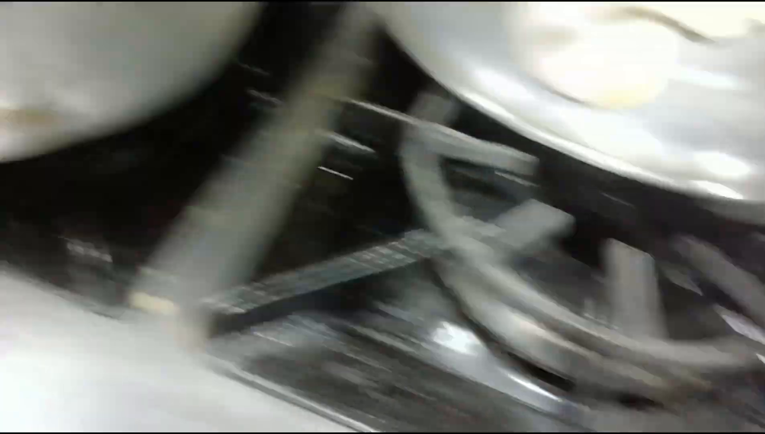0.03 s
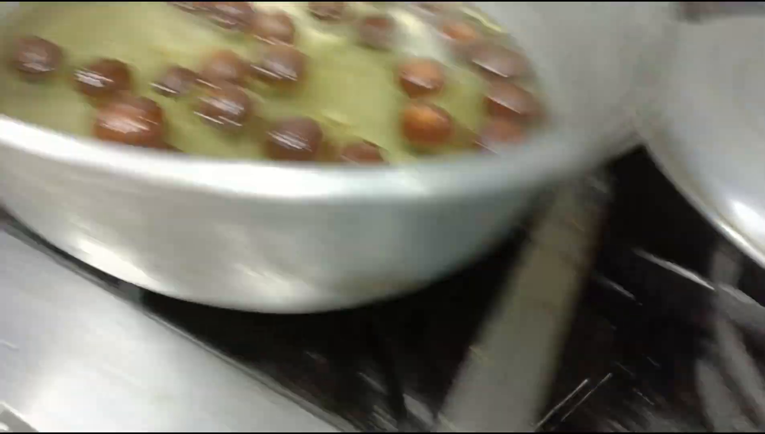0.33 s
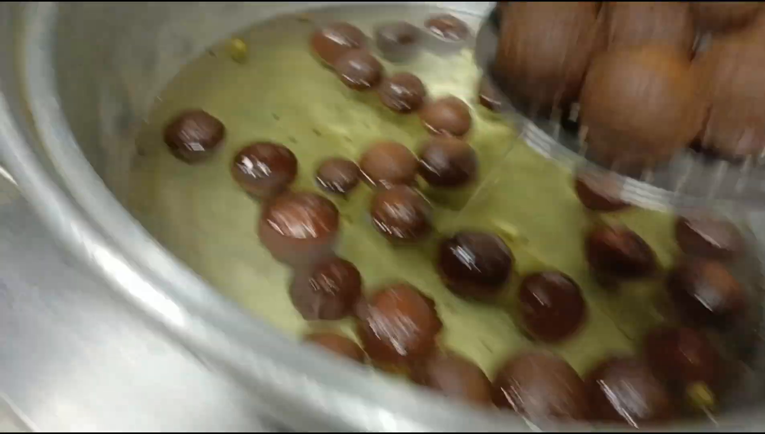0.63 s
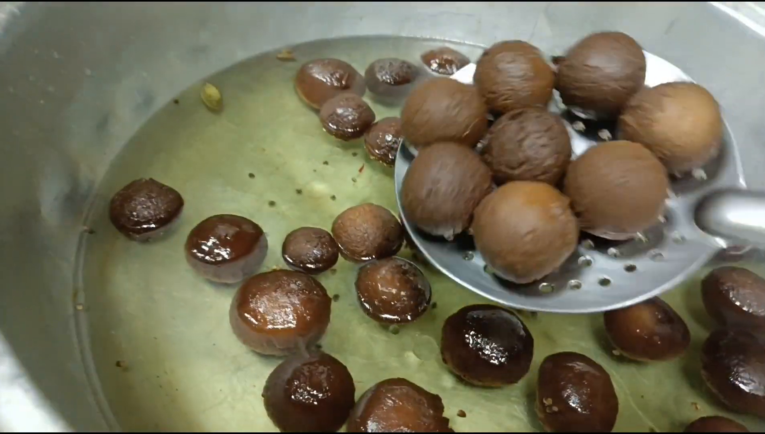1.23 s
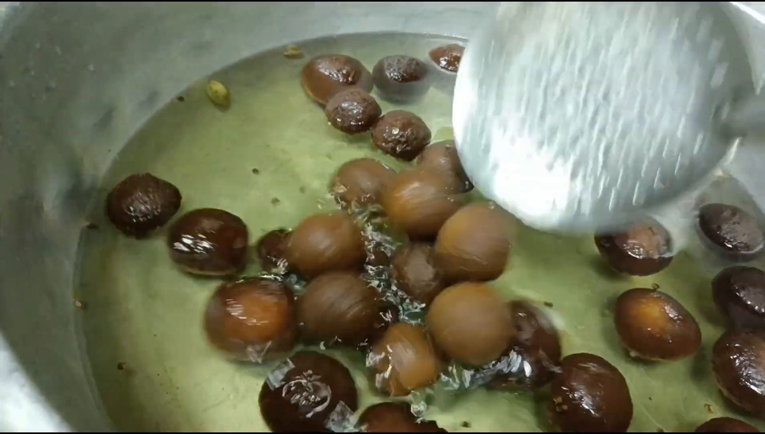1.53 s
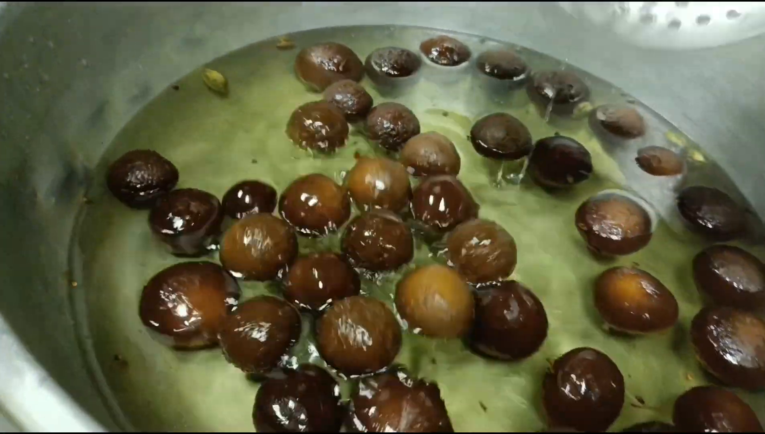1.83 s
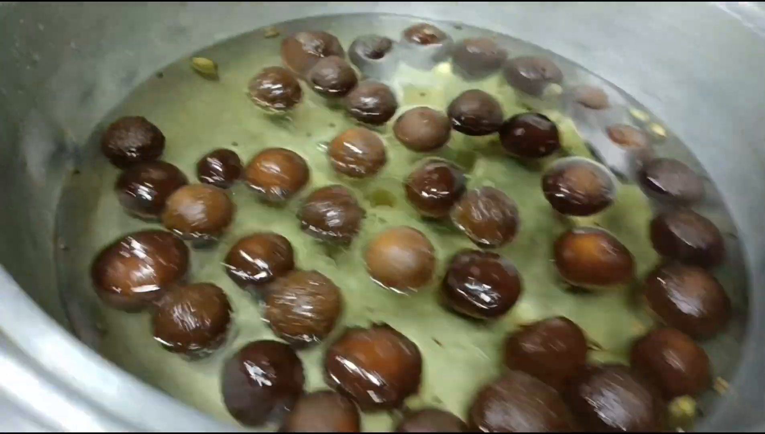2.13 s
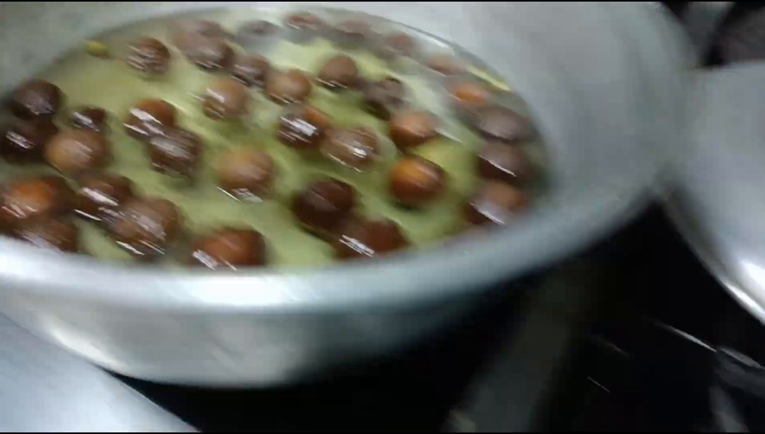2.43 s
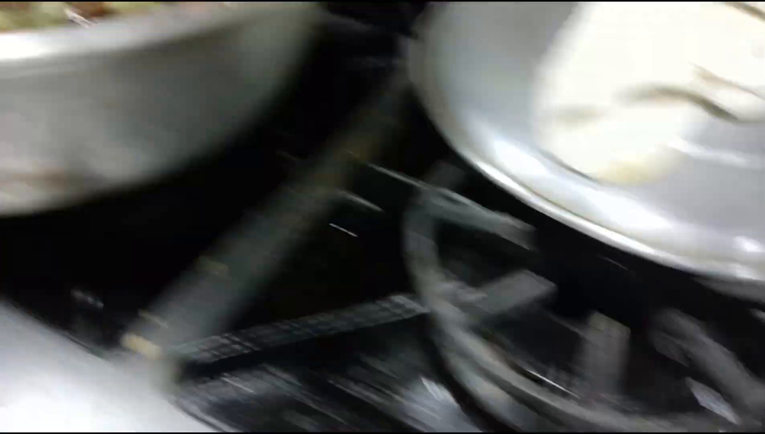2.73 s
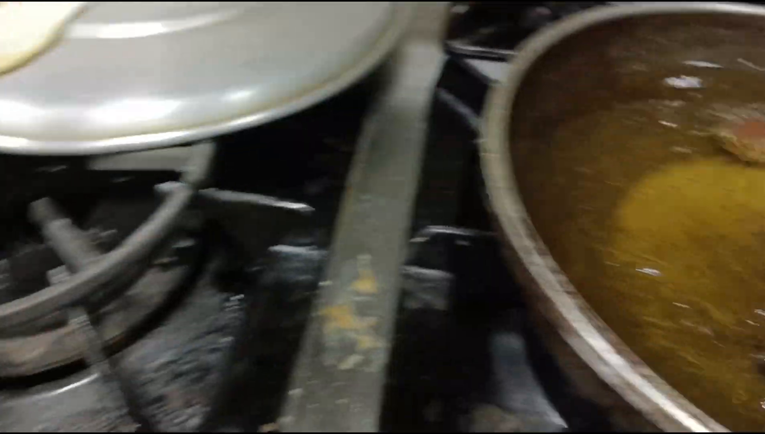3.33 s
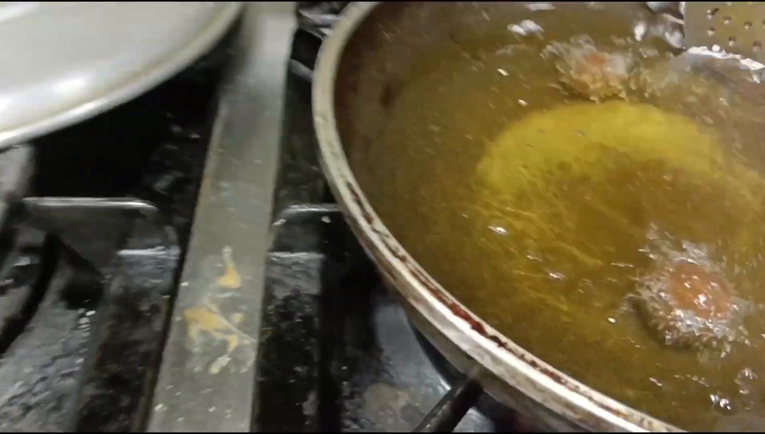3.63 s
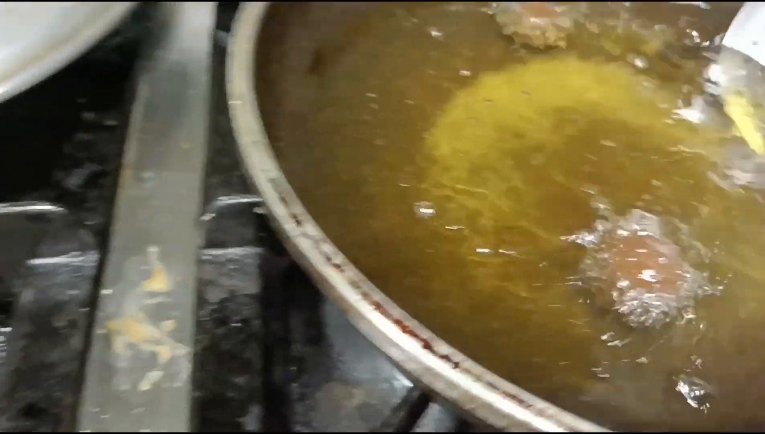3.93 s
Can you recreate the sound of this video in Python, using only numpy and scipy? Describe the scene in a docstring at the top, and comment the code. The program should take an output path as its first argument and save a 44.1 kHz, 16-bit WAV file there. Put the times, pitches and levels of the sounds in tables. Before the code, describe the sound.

Crackling fizz as hot fried balls plop into syrup, with frying oil hissing nearby.

```python
"""Hot fried balls slap and plop into a metal pot of syrup and set off a crackling fizz that dies away.
Bursting bubbles make the fizz, and the hollow of the pot colours it. Beside it, tiny steam bursts hiss
in a pan of oil over a gas flame; levels shift as the microphone moves from pan to pot and back.
The kitchen hums, a few soft thumps pass, and at the end a utensil clanks on metal close by."""
import sys
import numpy as np
from scipy import signal
from scipy.fft import rfft, irfft
from scipy.io import wavfile

SR = 44100
rng = np.random.default_rng(int(sys.argv[2]) if len(sys.argv) > 2 else 0)


def persist_wave(psi):
    """Save psi, clipped to +-1, as 16-bit WAV."""
    counts = np.round(np.clip(psi, -1, 1) * 32767).astype(np.int16)
    wavfile.write(sys.argv[1], SR, np.atleast_2d(counts).T)


N = 176400


def undb(db):
    """Decibels to gain."""
    return 10 ** (np.asarray(db, float) / 20)


def curve(rows):
    """A fader ride: gain over time, one row for each dB column."""
    rows = np.array(rows, float)
    return undb([np.interp(np.arange(N) / SR, rows[:, 0], col) for col in rows[:, 1:].T])


def waver(depth_db, per_s):
    """A gain that wanders at random."""
    return undb(depth_db * np.interp(np.arange(N) / SR * per_s, np.arange(256), rng.standard_normal(256)))


def since(start):
    """Seconds since the start, zero before it."""
    return np.maximum(np.arange(N) / SR - start, 0)


def strike(age, attack_s, t60_s):
    """A straight rise, then an exponential fall."""
    return np.minimum(age / attack_s, 1) * np.exp(-np.log(1000) * np.maximum(age - attack_s, 0) / t60_s)


def colour(x, rows, size=4096):
    """An EQ that gives unit white noise the listed dB per Hz, one row for each dB column."""
    rows = np.array(rows, float)
    log_hz = np.log(np.maximum(np.fft.rfftfreq(size, 1 / SR), 1))
    gain = undb([np.interp(log_hz, np.log(rows[:, 0]), col) for col in rows[:, 1:].T]) * np.sqrt(SR / 2)
    cepstrum = irfft(np.log(gain))
    cepstrum[:, 1:size // 2] *= 2  # minimum phase: nothing rings ahead of a click
    cepstrum[:, size // 2 + 1:] = 0
    impulse = irfft(np.exp(rfft(cepstrum)))
    return signal.fftconvolve(np.atleast_2d(x), impulse, axes=1)[:, :N]


def split(x, hz):
    """The parts below and above a frequency."""
    low = signal.sosfiltfilt(signal.butter(3, hz, fs=SR, output="sos"), x)
    return low, x - low


def flutter(hz, width_hz):
    """An unsteady tone of the given bandwidth; rms 1."""
    noise = rng.standard_normal(N) + 1j * rng.standard_normal(N)
    wander = signal.sosfilt(signal.butter(2, width_hz / 2, fs=SR, output="sos"), noise)
    tone = (wander * np.exp(2j * np.pi * np.cumsum(hz * np.ones(N)) / SR)).real
    return tone / tone.std()


def bursts(per_s, spread_db, max_boost_db=20):
    """Clicks of bursting bubbles, many small and a few large; rms 1."""
    chance, size, sign = rng.random(N), rng.exponential(size=N), rng.choice([-1, 1], N)
    clicks = (chance < per_s / SR) * sign * undb(np.minimum(spread_db * size, max_boost_db))
    return clicks / clicks.std()


def wide_bursts(per_s, spread_db, shared=.25):
    """Bursts that reach the two ears partly alike, partly by unrelated paths."""
    sides = np.array([bursts(per_s, spread_db), bursts(per_s, spread_db)])
    return np.sqrt(1 - shared) * sides + np.sqrt(shared) * bursts(per_s, spread_db)


def reflect(x, t60_s, wet_db, size=4096):
    """Dense reflections between metal walls, different for each ear; keeps the power."""
    tail = rng.standard_normal((2, size)) * strike(np.arange(size) / SR, 0.00057, t60_s)
    tail *= undb(wet_db) / np.sqrt((tail ** 2).sum(1, keepdims=True))
    tail[:, 0] = 1  # direct sound
    return signal.fftconvolve(np.atleast_2d(x), tail / np.hypot(1, undb(wet_db)), axes=1)[:, :N]


def reflect_moving(x, t60_s, wet_db, crossfade_s=.25):
    """Reflections whose pattern keeps changing as the microphone moves."""
    position = np.arange(N) / SR / crossfade_s
    fades = (np.cos(np.pi / 2 * np.minimum(abs(position - k), 1)) for k in range(int(position[-1]) + 2))
    return sum(reflect(x * fade, t60_s, wet_db) for fade in fades)


def smear(x, t60_s, wet_db):
    """Diffuse reflections: every click leaves a short tail of noise; keeps the power."""
    pole = np.exp(-2 * np.log(1000) / (t60_s * SR))
    tail = np.sqrt(signal.lfilter([1 - pole], [1, -pole], x ** 2)) * rng.standard_normal(x.shape)
    return (x + undb(wet_db) * tail) / np.hypot(1, undb(wet_db))


def delay_left(x, lag_s=.00023):
    """Sound from the pot reaches the left side a little late."""
    return np.array([x[np.maximum(np.arange(N) - round(lag_s * SR), 0)], x])


def kitchen():
    """Wavering room tone, alike in both ears in the bass, a hum and a few soft thumps."""
    # room tone: freq_hz, level_db
    room_eq = [(20, -108), (45, -93.5), (75, -84.5), (130, -89), (220, -87), (340, -93.5), (520, -101.5),
               (750, -100), (1200, -108), (2500, -113), (6000, -130)]
    # its fader: time_s, gain_db
    room_fader = [(0, -5), (.5, -9.5), (1.2, -5), (2, -5), (3.2, -7.5), (4, -9)]
    # hum partials: pitch_hz, level_db
    partials = [(99.6, -72), (199, -74), (243, -75.5), (299, -77.5)]
    # low thumps: start_s, level_db
    thump_cues = [(1.532, -58), (1.844, -49), (2.387, -54.5), (2.941, -48.5), (3.901, -50)]
    wide = signal.sosfilt(signal.butter(1, 597, "high", fs=SR, output="sos"), rng.standard_normal((2, N)))
    bands = split(colour(rng.standard_normal(N) + wide, room_eq), hz=150)
    air = sum(band * waver(depth_db=-0.5, per_s=9) for band in bands) * curve(room_fader)
    hum = thumps = 0
    for hz, db in partials:
        drift = 4.02 * np.cumsum(rng.standard_normal(N)) / np.sqrt(SR)
        hum += np.sqrt(2) * undb(db) * np.sin(2 * np.pi * hz * since(0) + drift)
    for start, db in thump_cues:
        age = since(start)
        thumps += undb(db) * strike(age, attack_s=0.016, t60_s=0.16) * np.sin(2 * np.pi * 78 * age)
    return air + hum + thumps


def burner():
    """The gas flame roars softly under the pan."""
    # flame roar: freq_hz, level_db
    roar_eq = [(150, -112), (240, -90.5), (400, -97), (520, -92), (680, -102), (1100, -114), (3000, -125)]
    # louder near the flame: time_s, gain_db
    roar_fader = [(0, -3.5), (.45, -1.5), (.8, -3), (1.2, -7.5), (2.8, -12.5), (3.3, -6), (3.6, -3.5),
                  (4, -4.5)]
    noise = rng.standard_normal(N) + undb(-3) * rng.standard_normal((2, N))
    return colour(noise, roar_eq) * curve(roar_fader)


def oil():
    """Countless tiny steam bursts merge into a hiss; larger ones gurgle under it."""
    # frying hiss: freq_hz, left_db, right_db
    hiss_eq = [(396, -115, -115), (980, -102, -101), (2400, -103, -100), (4300, -111, -107),
               (5600, -102, -100), (6150, -109, -103), (6540, -107, -85.5), (6820, -112, -99),
               (8800, -106, -90), (8700, -104, -103), (9970, -85.5, -99), (12000, -87, -107),
               (11670, -86.5, -95.5), (13670, -88.5, -101), (15300, -95, -101), (16700, -112, -104)]
    # its fader as the microphone turns: time_s, left_db, right_db
    hiss_fader = [(0, -4.5, -3.5), (.12, -4.5, -6.5), (.33, -2.5, -5.5), (.62, -4, -6), (.8, -4, -5.5),
                  (.95, -5.5, -4), (1.5, -7.5, -7.5), (3.1, -12, 1), (3.4, -8, 0), (3.56, -3, -5),
                  (3.75, -6.5, -6.5), (3.88, -8, -11), (4, -20, -11)]
    # extra ride on its top treble: time_s, gain_db
    top_fader = [(0, 8), (.8, 3), (1.3, 1), (3.1, -18), (3.45, -9), (4, -3)]
    # gurgle near the pan: freq_hz, left_db, right_db
    gurgle_eq = [(305, -112, -112), (619.5, -105, -104), (805, -107, -104), (950, -100, -91),
                 (1040, -108, -107), (1580, -100, -104), (1920, -103, -104), (1964, -99, -99.5),
                 (2500, -104, -107), (3300, -105, -108), (4850, -120, -120)]
    # its fader: time_s, gain_db
    gurgle_fader = [(0, -3), (2.3, -8.5), (2.7, 0), (3.1, 10), (3.25, 4), (3.65, 2.5), (4, -1)]
    body, top = split(colour(wide_bursts(per_s=15000, spread_db=3.5), hiss_eq), hz=13900)
    hiss = (body + top * curve(top_fader)) * curve(hiss_fader) * waver(depth_db=.7, per_s=22)
    large_bursts = reflect_moving(bursts(per_s=700, spread_db=2), t60_s=0.052, wet_db=14)
    gurgle = colour(large_bursts, gurgle_eq) * curve(gurgle_fader)
    return hiss + gurgle * waver(depth_db=3, per_s=6.7)


def simmer():
    """Fine bubbles burst steadily in the syrup."""
    # simmer inside the pot: freq_hz, left_db, right_db
    simmer_eq = [(1250, -112, -110), (2400, -108, -103), (3720, -109, -96), (3820, -116, -110),
                 (4780, -116, -93.5), (5470, -114, -86), (5840, -116, -95.5), (6800, -116, -88),
                 (8150, -116, -95.5), (9040, -102, -91.5), (10280, -89.5, -91), (12300, -88, -86.5),
                 (16800, -109, -99)]
    # its fader: time_s, gain_db
    simmer_fader = [(0, -9), (.85, -12), (1.15, -3), (1.32, -1), (1.55, 0.5), (1.88, 0), (2.6, -5.5),
                    (3.28, -3.5), (3.42, -8.5), (4, -15)]
    return colour(wide_bursts(per_s=15000, spread_db=2.5), simmer_eq) * curve(simmer_fader)


def whistles():
    """Thin, rough tones of escaping steam glide as they swell and fade."""
    # steam jets in the syrup: start_s, end_s, first_hz, last_hz, width_hz, left_db, right_db
    jets = [(0.1, 0.28, 5250, 5400, 140, -64, -62), (1.22, 1.75, 5000, 5400, 360, -78, -56.5),
            (2.023, 2.14, 3340, 3120, 280, -65, -58)]
    out = 0
    for start, end, first_hz, last_hz, width, left, right in jets:
        progress = np.minimum(since(start) / (end - start), 1)
        tone = flutter(first_hz + (last_hz - first_hz) * progress, width)
        out += undb([[left], [right]]) * tone * np.sqrt(abs(np.sin(np.pi * progress)))
    return out


def bubbles(count=520, low_hz=633, high_hz=2470, cycles=5.1, glide=0.16, size=2400):
    """Small bubbles in syrup and oil ring for a few cycles each, rising in pitch."""
    # bubbling fader: time_s, gain_db
    fader = [(0, -92), (2, -90), (2.25, -80), (2.7, -64), (3.1, -67), (3.3, -62), (3.65, -65), (4, -85)]
    out, age = np.zeros((2, N + size)), np.arange(size) / SR
    for when, pitch, softness, side in rng.random((count, 4)):
        hz = low_hz * (high_hz / low_hz) ** pitch
        t60, at = cycles / hz, int(when * N)
        tone = strike(age, 0.00066, t60) * np.sin(2 * np.pi * hz * age * (1 + glide * age / t60 / 2))
        level_db = -3 * np.log(softness + 0.023)
        out[:, at:at + size] += undb([[-8 * side], [0]]) * undb(level_db) * tone
    return out[:, :N] * curve(fader)


def clank(start_s=3.9772, right_lag_s=0.000159, thud_hz=156):
    """A utensil strikes metal: a scrape, ringing modes and a thud through the stove."""
    # metal modes: pitch_hz, left_db, right_db, t60_s
    modes = [(506, -44, -48, 0.064), (1005, -61, -41, 0.25), (1554, -49, -35.5, 0.13),
             (2490, -29.5, -35, 0.42), (3240, -22, -17, .06), (3312, -22.5, -13.5, 0.051),
             (3553, -17.5, -15, 0.25), (4600, -37, -30, 0.043), (5100, -47, -29, 0.042),
             (5900, -26, -47, 0.027), (6170, -48, -29, 0.14), (7680, -34, -29.5, 0.046),
             (11600, -26.5, -31, 0.045), (13900, -31, -40, 0.046), (15350, -42, -36, .05)]
    # contact scrape: freq_hz, left_db, right_db
    scrape_eq = [(40, -90, -99), (250, -72.5, -66.5), (450, -63.5, -69), (740, -80, -69.5),
                 (1390, -64.5, -84), (3300, -71.5, -59), (4180, -81, -69), (5700, -68, -61.5),
                 (8000, -75.5, -84), (9700, -69, -77), (13500, -71.5, -72), (16000, -76, -68)]
    age = np.array([since(start_s), since(start_s + right_lag_s)])
    ringing = sum(undb([[left], [right]]) * strike(age, 0.003, t60) * np.sin(2 * np.pi * hz * age)
                  for hz, left, right, t60 in modes)
    friction = rng.standard_normal(N) * strike(age[0], attack_s=0.00019, t60_s=0.17)
    scrape = colour(reflect(friction, t60_s=0.011, wet_db=-6), scrape_eq)
    thud = undb(-33) * strike(age, attack_s=0.024, t60_s=.15) * np.sin(2 * np.pi * thud_hz * age)
    return ringing + scrape + thud


def slaps():
    """The entering balls slap the syrup: short, wet flicks of noise."""
    # surface hits: start_s, left_db, right_db
    hits = [(1.923, -50, -36), (1.9316, -33, -23), (1.9412, -28.5, -32.5), (1.989, -41, -39),
            (1.997, -52, -37.5), (2.041, -34, -33)]
    # their colour: freq_hz, left_db, right_db
    spray_eq = [(1010, -19, -7), (3660, -6, -11), (4630, -10, -13), (5600, -11, 10), (8400, -26, -10),
                (11300, 5.5, 3.5), (15400, -7, 3)]
    envelope = sum(undb([[left], [right]]) * strike(since(start), attack_s=.001, t60_s=0.022)
                   for start, left, right in hits)
    spray = colour(rng.standard_normal((2, N)), spray_eq)
    return undb(-1.5) * envelope * spray / spray.std(1, keepdims=True)


def plops(rise_per_s=1.37, left_db=-12):
    """Air cavities left by the balls ring with rising pitch."""
    # cavities: start_s, pitch_hz, level_db, t60_s
    cavities = [(1.941, 850, -36.5, 0.049), (1.9445, 438, -47, 0.12), (1.9475, 1360, -45, 0.047),
                (1.9525, 684, -38, 0.017), (1.954, 916, -44, 0.081), (1.9675, 876, -39, 0.029),
                (1.969, 1740, -51, 0.012), (1.9725, 580, -35, 0.017), (1.978, 405.6, -41.5, 0.24),
                (1.989, 760, -39, 0.039), (1.9965, 900, -39.5, 0.04), (1.998, 1490, -49, 0.021),
                (2.003, 600, -52, 0.036), (2.015, 413, -45, 0.16), (1.994, 150, -52.5, 0.27),
                (2.155, 234, -44, 0.026)]
    out = 0
    for start, hz, db, t60 in cavities:
        age = since(start)
        tone = np.sin(2 * np.pi * hz * age * (1 + rise_per_s * age / 2))
        out += undb(db) * strike(age, 0.0018, t60) * tone
    return out * undb([[left_db], [0]])


def slosh(start_s=1.940, attack_s=0.0021, hold_s=0.048, t60_s=0.29):
    """The syrup churns briefly as the balls go in."""
    # churning syrup: freq_hz, left_db, right_db
    churn_eq = [(90, -104, -104), (146, -81, -89), (250, -91, -88), (425, -78, -74), (650, -77, -73),
                (930, -77, -78), (1120, -95, -95), (1370, -84, -83), (1900, -88, -87), (3080, -99, -98),
                (6000, -115, -114)]
    rise = np.minimum(since(start_s) / attack_s, 1)
    fall = np.exp(-np.log(1000) * since(start_s + hold_s) / t60_s)
    churn = bursts(per_s=1500, spread_db=3) * rise * fall
    return colour(reflect(churn, t60_s=0.11, wet_db=5.5), churn_eq)


def gushes(left_db=-9):
    """The syrup bubbles up in short gushes that each ring one hollow pitch in the pot."""
    # gushes: centre_s, length_s, pitch_hz, width_hz, level_db
    cues = [(2.146, 0.05, 2400, 200, -63.5), (2.27, 0.12, 2050, 90.5, -47), (2.285, 0.064, 1570, 120, -59),
            (2.457, 0.14, 2060, 70, -48), (2.58, .07, 2930, 150, -56), (2.583, 0.048, 950, 110, -56),
            (2.63, 0.057, 1550, 120, -57), (2.787, 0.12, 954, 90, -62), (2.763, 0.046, 650, 90, -61),
            (2.85, .06, 2100, 150, -46), (2.93, .12, 920, 80, -61.5), (2.96, 0.066, 1490, 89.4, -56.5),
            (3.1, 0.14, 1000, 80, -74), (3.155, .05, 2470, 90, -57)]
    out = 0
    for centre, length, hz, width, db in cues:
        progress = np.minimum(since(centre - length / 2) / length, 1)
        out += undb(db) * flutter(hz, width) * np.sin(np.pi * progress)
    return delay_left(out) * undb([[left_db], [0]])


def pops(crossover_hz=9500, cycles=25, size=2048):
    """Single large bubbles snap, each with its own brightness, brief ring and reflections."""
    # loud pops: start_s, left_db, right_db, treble_db, ring_hz, ring_db
    cues = [(2.1556, -20, -22, 0, 5400, -10), (2.3953, -26, -19, -8, 5350, -8),
            (2.5012, -26, -16, -13, 5100, -2), (2.5892, -20, -21, 1, 3750, -12),
            (2.6597, -20, -22, 3, 11500, -1), (2.7926, -26, -21, -5, 5800, -8),
            (2.8247, -24, -22, -2, 3800, -9), (2.8622, -22, -25, 3, 11500, -7),
            (2.9099, -26, -23, -4, 8400, -5), (2.925, -33, -26, 0, 4900, -12),
            (2.952, -31, -29, -6, 5470, 0), (2.9722, -28, -28, 0, 5200, -8),
            (3.0243, -31, -32, 2, 7700, -8), (3.1021, -24, -20, -4, 5500, -12),
            (3.1284, -29, -26, 4, 5600, -10), (3.1726, -38, -33, 2, 6200, -10),
            (3.2009, -32, -35, 7, 8200, 4), (3.2217, -31, -27, 4, 12300, -7),
            (3.2514, -36, -29, -7, 5700, -7), (3.268, -33, -33, 2, 6300, -9),
            (3.5452, -41, -54, -2, 10700, 10)]
    # their colour: freq_hz, left_db, right_db
    snap_eq = [(1000, -36, -29), (2500, -25, -19), (3500, -19, -12), (4400, -21, -14), (5200, -11, 3),
               (6500, -14, 0), (8000, -17, -2), (9200, -16, -7), (10600, -2, -4), (12000, 0, -1),
               (15500, -8, -7)]
    out, age = np.zeros((2, N + size)), np.arange(size) / SR
    snap = colour(1. * (age == 0), snap_eq)[:, :size]
    snap /= abs(snap).max()
    treble = signal.sosfilt(signal.butter(2, crossover_hz, "high", fs=SR, output="sos"), snap)
    body = signal.sosfilt(signal.butter(2, crossover_hz, fs=SR, output="sos"), snap)
    for start, left, right, treble_db, hz, ring_db in cues:
        tone = undb(ring_db - 9) * strike(age, .0001, cycles / hz) * np.sin(2 * np.pi * hz * age)
        pop = reflect(body - undb(treble_db) * treble + tone, t60_s=.012, wet_db=-4)
        at = int(start * SR)
        out[:, at:at + size] += undb([[left], [right]]) * pop[:, :size]
    return undb(3) * out[:, :N]


def pot(x):
    """The hollow of the pot rings at a few pitches, each coming and going, and echoes briefly."""
    # air resonances: pitch_hz, width_hz, gain_db
    modes = [(960, 70, 4), (1530, 90, -5), (2040, 70, 0), (2450, 90, -8), (2870, 100, -6), (3680, 100, -12)]
    ringing = 0
    for hz, width, db in modes:
        resonance = signal.lfilter(*signal.iirpeak(hz, hz / width, fs=SR), x)
        ringing += undb(db) * waver(depth_db=4, per_s=12) * resonance
    return reflect_moving(undb(-1.5) * (x + ringing), t60_s=.03, wet_db=-5)


def fizz(crossover_hz=4450):
    """Bubbles burst around the hot balls in a spurting crackle whose lower band rings the pot."""
    # fizz colour: freq_hz, left_db, right_db
    fizz_eq = [(200, -114, -114), (600, -104, -103), (950, -99, -94), (1170, -101, -99), (1520, -88, -82),
               (1800, -93, -86), (2100, -86, -81), (3700, -86, -80), (4300, -90, -83), (5100, -85, -74),
               (5700, -86, -74.5), (6500, -91, -79), (8000, -99, -85), (9200, -95, -86), (10700, -83, -84),
               (11900, -82, -82), (15700, -90, -85)]
    # swell and decay below and above the crossover: time_s, low_db, high_db
    faders = [(1.9, -49, -47.5), (1.96, -52, -11.5), (2.07, -9.5, -5.5), (2.16, 0, -2), (2.2, -3, 0.5),
              (2.275, 5, 1.5), (2.4, -4, 1), (2.52, 4, 0.5), (2.72, -1.5, -0.5), (2.86, -2.5, -2),
              (3.05, -10.5, -5), (3.2, -19, -12), (3.4, -33, -24), (4, -42, -30)]
    # diffuse reflections in the pot, left row then right row: wet_db
    sends = [
        [2],
        [-3.5],
    ]

    def crackle(spread_db):
        """Smeared bubble clicks, as a low and a high band."""
        clicks = delay_left(bursts(per_s=6500, spread_db=spread_db))
        return split(colour(smear(clicks, t60_s=0.024, wet_db=sends), fizz_eq), crossover_hz)

    low, _ = crackle(spread_db=4.5)
    _, high = crackle(spread_db=4.1)
    low_gain, high_gain = curve(faders)
    return (pot(low) * low_gain + high * high_gain) * waver(depth_db=0.9, per_s=24)


def scene():
    """Everything at the stove, in stereo."""
    return (oil() + simmer() + fizz() + gushes() + whistles() + bubbles() + pops()
            + slaps() + plops() + slosh() + clank() + burner() + kitchen())


def record(dry):
    """A steep high cut at 16 kHz."""
    return signal.sosfilt(signal.ellip(10, .2, 70, 16000, fs=SR, output="sos"), dry)


dry = scene()
out = record(dry)
persist_wave(out)
```